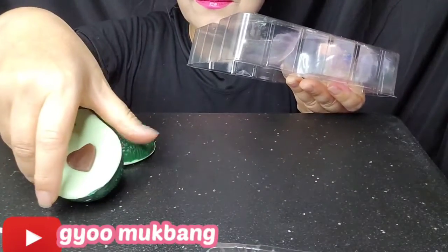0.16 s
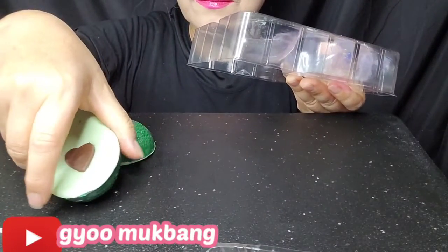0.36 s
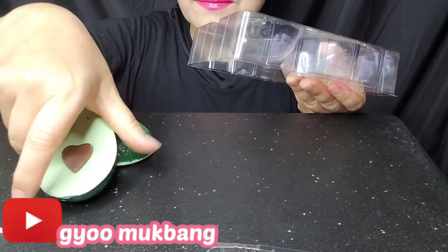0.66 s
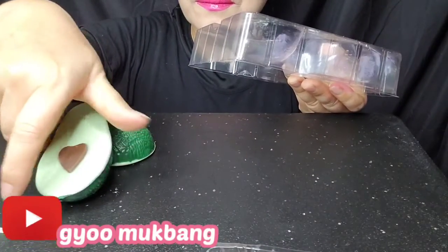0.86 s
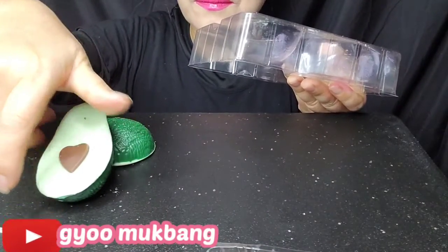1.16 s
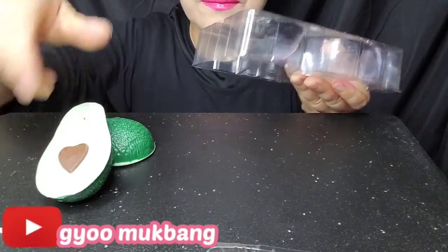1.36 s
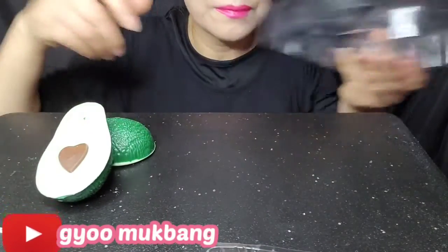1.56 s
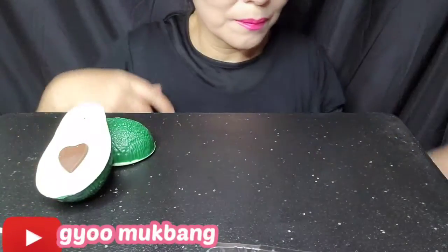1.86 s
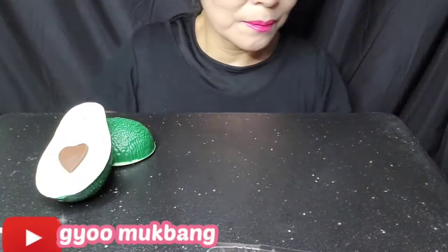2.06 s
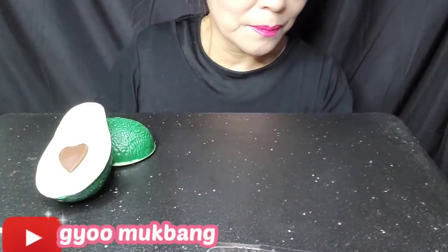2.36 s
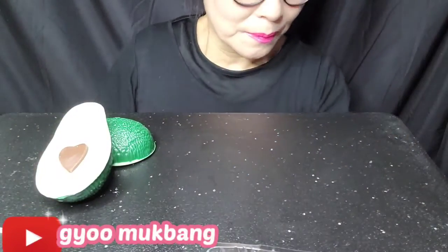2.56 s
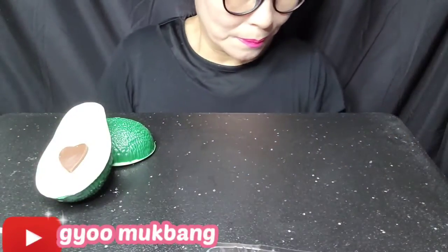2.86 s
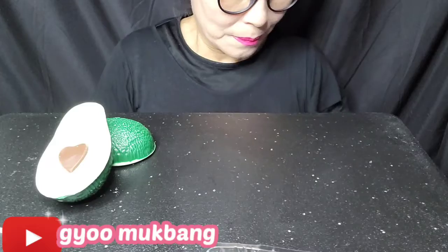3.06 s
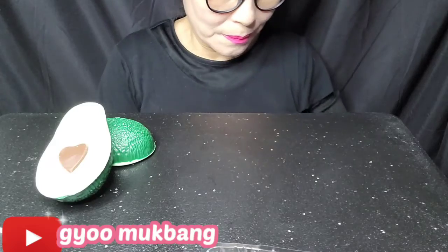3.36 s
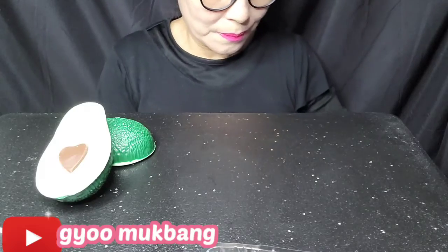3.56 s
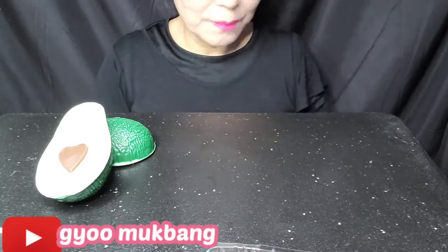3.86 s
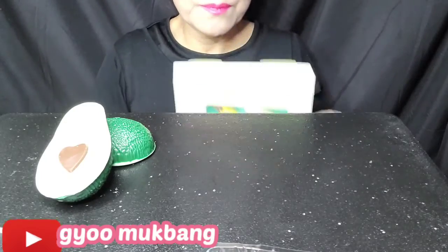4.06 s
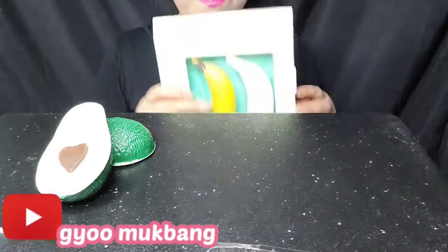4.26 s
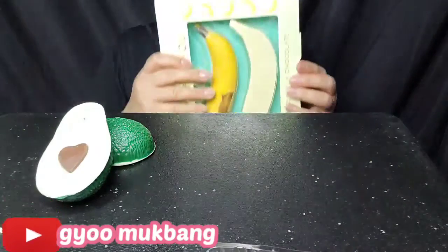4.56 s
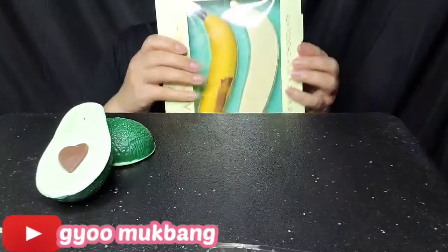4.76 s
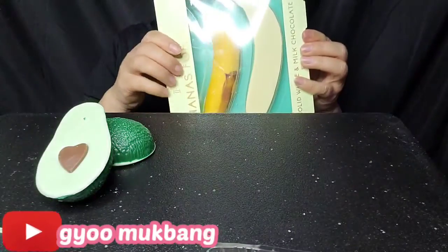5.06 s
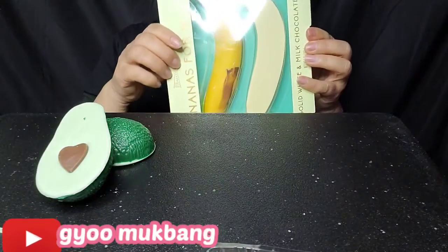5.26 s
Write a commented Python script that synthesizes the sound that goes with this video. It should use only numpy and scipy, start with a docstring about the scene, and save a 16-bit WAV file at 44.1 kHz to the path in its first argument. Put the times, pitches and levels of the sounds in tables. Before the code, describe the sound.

Close handling sounds in a small room with a short tail, over steady low rumble, faint hiss and a barely perceptible high whine. From 0.1 to 0.6 s a hollow chocolate shell is nudged on a table: dull low thuds, small ticks and a brief shuddering scrape that swells at 0.45-0.75 s. A soft table push comes at 0.83 s, with weaker thuds around 1 s. From 1.4 s sleeves brush very faintly; a light empty tray lands softly at 2.1 s. At 2.55 s a card box begins to drag with hollow drumming and rasp, with a loud tight cluster of knocks at 2.82 s, another bump at 3.38 s and lighter knocks until 3.83 s. Small window snaps start at 3.5 s. From 4.05 s dry fingers swish over card in uneven strokes, with brittle plastic clicks gathering at 4.6-4.75 s and a crisp, bright snap at 4.93 s, then fading rubs to 5.35 s.

```python
"""A card box with a plastic window: it drums and rasps when dragged, knocks when bumped; its window snaps.
Fingers slide over the card. Before that a chocolate is nudged over a table top and an empty tray put aside.
Contacts are clicks, noise flutter and damped modes; rubbing is random slips and noise under speed curves.
A short room tail follows, over low rumble, faint hiss and a faint steady whine."""
import sys
import numpy as np
from scipy import signal
from scipy.fft import rfft, irfft, next_fast_len
from scipy.io import wavfile
from scipy.ndimage import uniform_filter1d, map_coordinates

SR = 44100
rng = np.random.default_rng(int(sys.argv[2]) if len(sys.argv) > 2 else 0)


def waveform_to_disk(signal):
    """Save audio, clipped to [-1, 1], as 16-bit WAV at the path in sys.argv[1]."""
    frames = np.transpose(np.atleast_2d(signal))
    scaled = np.clip(frames, -1, 1) * 32767
    samples = np.round(scaled).astype(np.int16)
    wavfile.write(sys.argv[1], SR, samples)


N = 238925  # samples


def amp(db):
    """Decibels to gain."""
    return 10 ** (np.asarray(db) / 20)


def unit(x):
    """Scale to rms 1."""
    return x / np.sqrt(np.mean(x ** 2) + 1e-20)


def burst(x):
    """Scale to the energy of ten milliseconds at rms 1."""
    return x / np.sqrt(np.sum(x ** 2) / (SR / 100) + 1e-20)


def along(points, hz):
    """Interpolate (Hz, value) points on a log frequency axis."""
    point_hz, values = np.transpose(points)
    return np.interp(np.log(hz + 1), np.log(point_hz), values)


def wobble(knots_per_s):
    """A smooth random curve through evenly spaced knots."""
    knots = rng.standard_normal(int(N * knots_per_s / SR) + 4)
    return map_coordinates(knots, [np.arange(N) * knots_per_s / SR])


def filtered(x, response):
    """x times a response of frequency."""
    size = next_fast_len(N + SR // 2)
    hz = np.fft.rfftfreq(size, 1 / SR)
    return irfft(rfft(x, size) * response(hz), size)[:N]


def coloured(x, spectrum):
    """x shaped by a spectrum, at rms 1."""
    return unit(filtered(x, lambda hz: amp(along(spectrum, hz))))


def noise(spectrum):
    """Smooth noise with a spectrum, at rms 1."""
    return coloured(rng.standard_normal(N), spectrum)


def pulse(spectrum, size=2048):
    """The causal, minimum-phase pulse of a spectrum, by folding its cepstrum."""
    hz = np.fft.rfftfreq(size, 1 / SR)
    cepstrum = irfft(np.log(amp(along(spectrum, hz))))
    fold = 1 + np.sign(size // 2 - np.arange(size))
    fold[0] = 1
    return irfft(np.exp(rfft(cepstrum * fold)))


def add(track, start_s, sound):
    """Lay a sound into a track."""
    part = track[round(start_s * SR):][:len(sound)]
    part += sound[:len(part)]


def ring(modes, t, scatter_db=2, detune=0.0098):
    """Damped modes; the grip changes their strength and pitch at every contact."""
    chance = rng.standard_normal((len(modes), 3))
    total = np.zeros(len(t))
    for (pitch_hz, level_db, t60_s), (z, flip, bend) in zip(modes, chance):
        decay = np.sign(flip) * amp(level_db + scatter_db * z - 60 * t / t60_s)
        total += decay * np.sin(2 * np.pi * pitch_hz * (1 + detune * bend) * t)
    return total * (1 - np.exp(-t / 0.0015))


def contacts(rows, colour, modes, flutter_t60_s, click_db, ring_db, low_hz=600, high_hz=2500):
    """Each contact is a click, a dense flutter of the thin wall and a few longer modes."""
    t = np.arange(SR // 3) / SR
    out, click = np.zeros(N), pulse(colour)
    low = signal.butter(3, low_hz, "low", fs=SR, output="sos")
    mid = signal.butter(3, [low_hz, high_hz], "band", fs=SR, output="sos")
    high = signal.butter(3, high_hz, "high", fs=SR, output="sos")
    swell = amp(-60 * t / flutter_t60_s) * (1 - np.exp(-t / 0.0006))
    for start_s, level_db, thud_db, crack_db in rows:
        flutter = signal.fftconvolve(rng.standard_normal(len(t)) * swell, click)[:len(t)]
        sound = burst(flutter) + amp(ring_db) * burst(ring(modes, t))
        add(sound, 0, amp(click_db) * burst(click))
        # a heavy, soft contact favours the thud; a light, hard one the crack
        for band, tilt_db in ((low, thud_db), (mid, 0), (high, crack_db)):
            add(out, start_s, amp(level_db + tilt_db) * burst(signal.sosfilt(band, sound)))
    return out


def friction(spectrum, slips_per_s, spread_db, smooth_db):
    """Random tiny slips of uneven size, over a smooth rub, at rms 1."""
    sizes = amp(spread_db * np.minimum(rng.exponential(size=N), 3))
    signs = np.sign(rng.standard_normal(N))
    slips = (rng.random(N) < slips_per_s / SR) * sizes * signs
    rub = amp(smooth_db) * rng.standard_normal(N)
    return coloured(unit(slips) + rub, spectrum)


def flexing(x, depth_db):
    """A bending sheet colours x with resonances that come and go."""
    z = signal.stft(x, nperseg=256)[2]
    field = rng.standard_normal(z.shape)
    field = uniform_filter1d(field, size=3, axis=0)  # over frequency
    field = uniform_filter1d(field, size=30, axis=1)  # over time
    gain = unit(amp(depth_db * unit(field)))
    return signal.istft(z * gain, nperseg=256)[1][:N]


def strokes(rows, stop_s, swell_db_per_s=0, law=lambda speed: [speed]):
    """A gain curve per dB column: speed rises, may hold, then falls; law turns it into loudness."""
    gains = np.zeros((len(rows[0]) - 3, N))
    for start_s, length_s, rise_s, *levels_db in rows:
        t = np.arange(round(length_s * SR)) / SR
        speed = np.clip(np.minimum(t / rise_s, (length_s - t) / stop_s), 0, 1)
        for gain, level_db, shape in zip(gains, levels_db, law(speed)):
            add(gain, start_s, amp(level_db + swell_db_per_s * t) * shape)
    return gains


# Levels in all tables are relative, before the layer gains.
# box knocks: start_s, level_db, thud_db, crack_db
BOX_KNOCKS = [(2.558, -21.5, -4, -20), (2.652, -23, -6, -12.5), (2.806, -24.5, 13, -8),
              (2.818, -7.5, -3.5, -24.5), (2.827, -8, 0, -18), (2.842, -8.5, -0.5, -27),
              (2.855, -25, -4, -26), (2.902, -30.5, 7.5, -14), (2.975, -37, 11.5, -20),
              (3.071, -45.5, 14.5, -19), (3.163, -37, 8, -7), (3.182, -35.5, 11.5, -1),
              (3.314, -35, 1.5, -3.5), (3.335, -32, -2, -11), (3.383, -19.5, 6, -19.5),
              (3.386, -17, -2, -26), (3.439, -22, -6, -8.5), (3.566, -32.5, 12.5, -15), (3.602, -41, 18, 3),
              (3.725, -40.5, 11.5, -27), (3.828, -27, -2.5, -8)]
# box resonances: pitch_hz, level_db, t60_s
BOX_RESONANCES = [(157, -5.5, 0.053), (297, -9, 0.19), (423.7, -2.5, 0.11), (499.8, -1, 0.12),
                  (562, 2, 0.066), (702, -11.5, 0.29), (754, 0, 0.066), (883, -2, 0.067),
                  (1035, -4.5, 0.12), (1187, -2, 0.05), (1493, -6.5, 0.12)]
# knock spectrum: freq_hz, level_db
BOX_SPECTRUM = [(50, -21.5), (110, -20.5), (180, -1.5), (260, -6), (520, 3), (1000, -7.5), (1600, -9),
                (2400, -15), (4000, -15.5), (5800, -19), (8000, -37), (14000, -60.5)]
# pulls on the box: start_s, length_s, rise_s, body_db, rasp_db, hiss_db
BOX_PULLS = [(2.552, 0.091, 0.032, -28, -41, -65), (2.61, 0.22, 0.13, -29.5, -34, -44.5),
             (2.77, 0.24, 0.036, -33, -45.5, -53), (2.963, 0.23, 0.03, -42, -66, -76),
             (3.146, 0.24, 0.045, -51, -57.5, -72.5), (3.3, 0.34, 0.17, -35.5, -43.5, -55.5),
             (3.555, 0.37, 0.051, -37, -49, -59.5), (3.86, 0.14, 0.035, -45.5, -50, -46.5),
             (3.938, 0.21, 0.029, -43.5, -53, -65)]
# hollow body, drag rasp and rub hiss spectra: freq_hz, level_db
HOLLOW_SPECTRUM = [(100, 4), (250, -14), (420, 6.5), (560, 5.5), (720, -4), (920, -2), (1300, -12),
                   (2500, -55)]
DRAG_SPECTRUM = [(470, -29), (800, 5), (1230, -6.5), (1430, -4), (1810, -3), (1960, -2), (2460, -11),
                 (2910, -3), (3370, -6), (5940, -9.5), (9680, -27), (12000, -61), (15600, -81),
                 (22000, -120)]
HISS_SPECTRUM = [(2200, -49), (3200, 1.5), (6000, 1), (8000, -6), (10000, -9.5), (12000, -21), (15500, -25)]
# every pull or slide eases off as it goes, then slows to a stop
HAND_STOP_S, HAND_EASE_DB_PER_S = 0.12, -17.5


def box():
    """The hollow card box knocks, and drums and rasps as it is dragged."""
    law = lambda speed: [speed ** 0.97, speed ** 1.27, speed ** 2.85]  # faster is brighter
    body, rasp, hiss = strokes(BOX_PULLS, HAND_STOP_S, HAND_EASE_DB_PER_S, law)
    knocks = contacts(BOX_KNOCKS, BOX_SPECTRUM, BOX_RESONANCES, flutter_t60_s=0.15, click_db=-6.5, ring_db=1.5)
    hollow = friction(HOLLOW_SPECTRUM, slips_per_s=140, spread_db=-4, smooth_db=3)
    drumming = body * flexing(hollow, depth_db=5)
    rasping = rasp * friction(DRAG_SPECTRUM, slips_per_s=400, spread_db=4, smooth_db=4)
    hissing = hiss * noise(HISS_SPECTRUM)
    catch = amp(0.88 * wobble(45))  # the card catches and lets go
    rubbing = catch * flexing(amp(2) * rasping + amp(3.5) * hissing, depth_db=1.8)
    return amp(-7.5) * knocks + amp(-1) * drumming + rubbing


# window snaps: start_s, level_db, thud_db, crack_db
WINDOW_SNAPS = [(3.51, -30.5, 4, 2), (3.778, -25, 0.5, 1.5), (3.985, -40, -7, 8), (3.999, -25, -4.5, -25),
                (4.321, -43, -8, -2), (4.369, -45, -2, -5), (4.404, -40.5, 11.5, -3),
                (4.439, -34.5, 7.5, -8), (4.571, -27, -3, -10), (4.644, -33.5, -15, -15),
                (4.674, -29.5, 1.5, -24), (4.696, -22, -12, -6.5), (4.719, -22, -2, -9),
                (4.741, -28, 10, -32), (4.746, -9.5, -5.5, -25.5), (4.881, -31.5, -12, -5),
                (4.906, -26.5, -20, -4), (4.915, -28, -31, 2), (4.934, -6.5, -30, -7.5),
                (4.937, -10, -5, -31)]
# pane resonances: pitch_hz, level_db, t60_s
WINDOW_RESONANCES = [(342, -11, 0.18), (570.5, 1.5, 0.12), (863, -17, 0.15), (1010, 1, 0.069),
                     (1210, -3, 0.099), (1530, -17, 0.067), (1670, -4, 0.12), (1810, 7.5, 0.026),
                     (2190, -7, 0.045), (2860, -17.5, 0.02)]
# snap spectrum: freq_hz, level_db
WINDOW_SPECTRUM = [(70, -15), (250, 6.5), (550, 1.5), (1400, 2), (2100, -9), (3200, -1.5), (4200, -9.5),
                   (5400, -6.5), (6500, -23), (10000, -33.5), (15000, -63)]


def window():
    """The stiff plastic pane buckles with sharp snaps."""
    snaps = contacts(WINDOW_SNAPS, WINDOW_SPECTRUM, WINDOW_RESONANCES,
                     flutter_t60_s=0.026, click_db=-3.5, ring_db=-7.5)
    return amp(-11) * snaps


# finger slides: start_s, length_s, rise_s, body_db, rasp_db, hiss_db
FINGER_SLIDES = [(4.048, 0.34, 0.18, -41.5, -53.5, -51.5), (4.339, 0.39, 0.165, -36, -46, -53),
                 (4.684, 0.22, 0.025, -52, -57, -66), (4.817, 0.58, 0.098, -48.5, -46.5, -51.5),
                 (5.144, 0.21, 0.045, -45, -52.5, -59.5)]
# skin rasp spectrum: freq_hz, level_db
FINGER_SPECTRUM = [(500, -9), (1200, 2), (1700, -3), (2200, -7.5), (2900, -1), (3500, -3), (4300, -10),
                   (5400, -3.5), (6300, -25), (7500, -21), (11000, -36)]
GLIDE_DB = -11.5  # skin judders when slow and glides at full speed


def fingers():
    """Dry skin swishes over the smooth card, which drums softly."""
    law = lambda speed: [speed ** 0.41 * amp(GLIDE_DB * speed), speed ** 0.68, speed ** 2.8]
    body, rasp, hiss = strokes(FINGER_SLIDES, HAND_STOP_S, HAND_EASE_DB_PER_S, law)
    drumming = body * friction(HOLLOW_SPECTRUM, slips_per_s=250, spread_db=8, smooth_db=1)
    rasping = rasp * friction(FINGER_SPECTRUM, slips_per_s=1500, spread_db=8, smooth_db=5)
    hissing = hiss * noise(HISS_SPECTRUM)
    catch = amp(1.9 * wobble(50))  # the skin grips unevenly
    swish = amp(-3) * drumming + amp(0.5) * rasping + amp(4.5) * hissing
    return catch * flexing(swish, depth_db=1.9)


# chocolate rocking on the table: start_s, level_db
ROCKING_THUDS = [(0.133, -29), (0.454, -28.5), (0.525, -30), (0.542, -27), (0.598, -35.5), (0.997, -37),
                 (1.03, -35), (1.238, -42.5)]
# table top resonances: pitch_hz, level_db, t60_s
TABLE_RESONANCES = [(59, -8.5, 0.12), (133, -6, 0.074), (202, 0.5, 0.093), (396, -12, 0.043)]
# light ticks of the shell: start_s, level_db, thud_db, crack_db
SHELL_TICKS = [(0.133, -45, 13.5, -39), (0.307, -33, 0, -6), (0.512, -32, -11, -15),
               (0.535, -22.5, -8, -21), (0.576, -23.5, 2, -30), (1.416, -46, -14, -5),
               (1.444, -47.5, -8, -2)]
# nudges: start_s, length_s, rise_s, shudder_db, grit_db, squeak_db
CHOCOLATE_NUDGES = [(0.3, 0.27, 0.022, -68, -67.5, -78.5), (0.445, 0.32, 0.0067, -40, -51, -66),
                    (0.815, 0.14, 0.022, -45, -67, -61.5)]
# tick, table shudder, grit and squeak spectra: freq_hz, level_db
TICK_SPECTRUM = [(100, -24), (500, 0.5), (1300, 12.5), (2400, -1), (3500, -7), (5500, -19), (7500, -26),
                 (15000, -63)]
SHUDDER_SPECTRUM = [(25, 3), (60, 10), (130, 8.5), (210, 14.5), (250, -16), (320, -12), (700, -73)]
GRIT_SPECTRUM = [(400, -2), (750, -4), (1150, -5), (1700, -6.5), (2100, -14), (2600, -13.5), (3200, -19),
                 (4200, -20), (5100, -19), (6200, -23.5), (7500, -42), (14000, -58)]
SQUEAK_SPECTRUM = [(3800, -10), (5100, 2.5), (5500, -9), (6600, -29)]
NUDGE_STOP_S, NUDGE_SWELL_DB_PER_S = 0.18, 45


def chocolate():
    """The shell rocks, ticks, scrapes and faintly squeaks; the table top booms under it."""
    t = np.arange(SR // 3) / SR
    soft_onset = 1 - np.exp(-t / 0.012)
    thuds = np.zeros(N)
    for start_s, level_db in ROCKING_THUDS:
        boom = ring(TABLE_RESONANCES, t, detune=0.044) * soft_onset
        add(thuds, start_s, amp(level_db - 3.5) * burst(boom))
    law = lambda speed: [speed ** 1.68, speed ** 2.6, speed ** 1.8]  # grit needs more speed than shudder
    shudder, grit, squeak = strokes(CHOCOLATE_NUDGES, NUDGE_STOP_S, NUDGE_SWELL_DB_PER_S, law)
    shuddering = shudder * friction(SHUDDER_SPECTRUM, slips_per_s=220, spread_db=5.5, smooth_db=1)
    scraping = grit * friction(GRIT_SPECTRUM, slips_per_s=300, spread_db=3.5, smooth_db=-2)
    squeaking = squeak * noise(SQUEAK_SPECTRUM)
    ticks = contacts(SHELL_TICKS, TICK_SPECTRUM, TABLE_RESONANCES, flutter_t60_s=0.032, click_db=-2, ring_db=-17)
    return thuds + shuddering + amp(-0.5) * scraping + squeaking + amp(-16.5) * ticks


# tray landings: start_s, level_db, thud_db, crack_db
TRAY_LANDINGS = [(2.094, -32, 13, -33), (2.102, -27, 4.5, -26.5)]
# tray resonances: pitch_hz, level_db, t60_s
TRAY_RESONANCES = [(203, -5.5, 0.17), (337, -3.5, 0.24), (412.7, -3.5, 0.11), (611.5, -11, 0.16),
                   (1193, -7, 0.064)]
# arm swings that brush the sleeves, tray skids: start_s, length_s, rise_s, level_db
ARM_SWINGS = [(1.4, 1.64, 0.37, -69.5), (1.77, 0.23, 0.05, -61.5), (2.03, 0.21, 0.019, -61),
              (2.4, 0.14, 0.11, -61)]
TRAY_SKIDS = [(2.09, 0.11, 0.065, -59.5)]
# landing, cloth and skid spectra: freq_hz, level_db
TRAY_SPECTRUM = [(80, -27), (190, 0.5), (420, -7.5), (800, -7), (1400, -13), (2200, -31), (6000, -20),
                 (14000, -66)]
CLOTH_SPECTRUM = [(530, -36), (900, -3), (1160, -0.5), (1710, 1.5), (1900, -1), (3910, -3), (4870, -1),
                  (5990, -3.5), (10500, -28), (14000, -37)]
SKID_SPECTRUM = [(1500, -24), (2300, 0), (2700, 1), (3600, -27)]
SWING_STOP_S, SKID_STOP_S = 0.1, 0.016


def tray():
    """Sleeves brush as the light tray is swung aside, set down and let slide."""
    sleeve, = strokes(ARM_SWINGS, SWING_STOP_S)
    skid, = strokes(TRAY_SKIDS, SKID_STOP_S)
    landing = contacts(TRAY_LANDINGS, TRAY_SPECTRUM, TRAY_RESONANCES,
                       flutter_t60_s=0.14, click_db=-4.5, ring_db=4.5)
    cloth = friction(CLOTH_SPECTRUM, slips_per_s=2000, spread_db=-1, smooth_db=-6)
    brushing = sleeve * flexing(cloth, depth_db=3)
    return amp(-6) * landing + amp(-0.5) * brushing + skid * noise(SKID_SPECTRUM)


# soft pushes against the table: start_s, level_db
TABLE_PUSHES = [(0.0, -38), (0.831, -28.5), (4.021, -33.5), (4.229, -43)]
# slow table sway: pitch_hz, level_db, t60_s
SWAY_RESONANCES = [(48, -0.5, 0.18), (83.3, -6, 0.11)]


def table():
    """A soft push moves only the lowest modes of the table."""
    t = np.arange(SR // 3) / SR
    sway = np.zeros(N)
    for start_s, level_db in TABLE_PUSHES:
        add(sway, start_s, amp(level_db) * ring(SWAY_RESONANCES, t, scatter_db=1))
    return sway


# room decay: freq_hz, t60_s
ROOM_DECAY = [(150, 0.31), (500, 0.22), (2500, 0.14), (9000, 0.1)]


def room(x):
    """A short tail of decaying noise; each frequency dies at its own speed."""
    hz, t, z = signal.stft(rng.standard_normal(SR // 2), SR, nperseg=256)
    decay = amp(-60 * t / along(ROOM_DECAY, hz)[:, None])
    tail = signal.istft(z * decay, SR, nperseg=256)[1]
    delayed = np.pad(x, (round(0.004 * SR), 0))
    return signal.fftconvolve(delayed, tail / np.linalg.norm(tail))[:N]


# background spectrum: freq_hz, level_db
FLOOR_SPECTRUM = [(12, -60), (20, -4.5), (55, 1), (130, -2), (385, -14.5), (495, -14), (654, -22.5),
                  (1210, -28), (2110, -42.5), (4360, -45), (5010, -40), (7410, -53.5), (8290, -49),
                  (10400, -56), (15700, -55)]
FLOOR_DB, WHINE_DB, WHINE_HZ = -47.5, -87, 8000


def background():
    """Shaped noise gives room rumble and faint hiss; a sine gives a faint electronic whine."""
    whine = amp(WHINE_DB) * np.sin(2 * np.pi * WHINE_HZ * np.arange(N) / SR)
    return amp(FLOOR_DB) * noise(FLOOR_SPECTRUM) + whine


def scene():
    """All the handling, its room and the background."""
    near = box() + window() + fingers() + chocolate() + tray() + table()
    return (near + amp(-14) * room(near) + background())[None]


TOP_HZ = 15800


def record(dry):
    """A sharp band limit removes everything from TOP_HZ up."""
    return filtered(dry[0], lambda hz: hz < TOP_HZ)[None]


dry = scene()
out = record(dry)
waveform_to_disk(out)
```